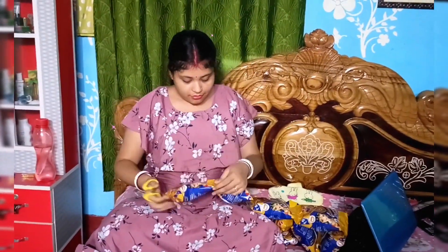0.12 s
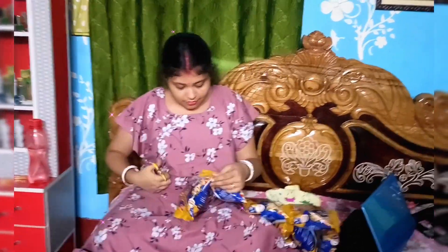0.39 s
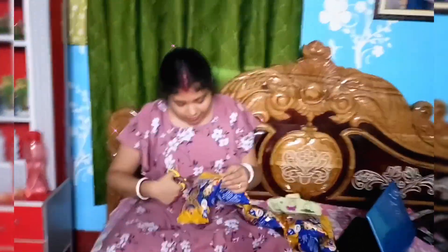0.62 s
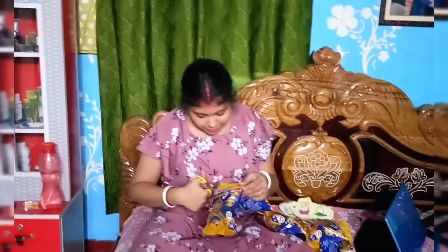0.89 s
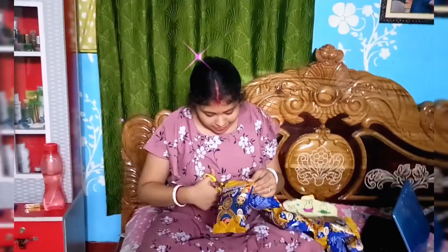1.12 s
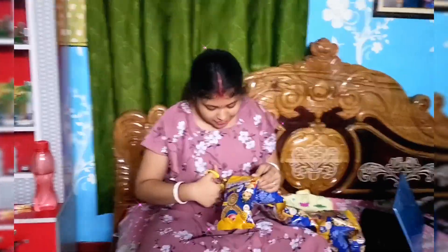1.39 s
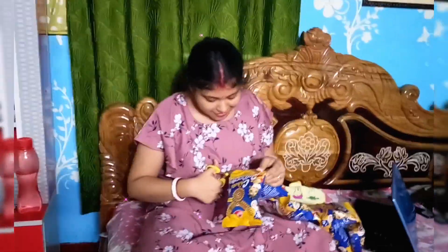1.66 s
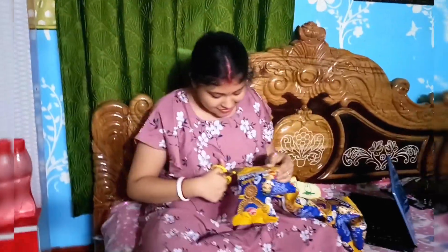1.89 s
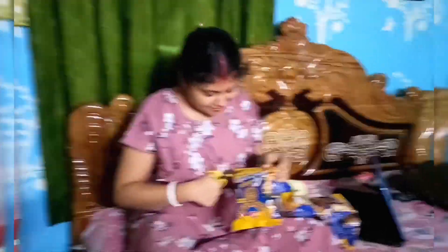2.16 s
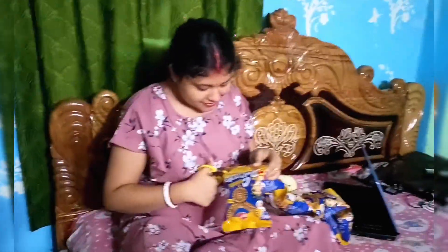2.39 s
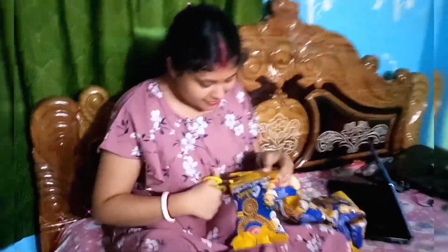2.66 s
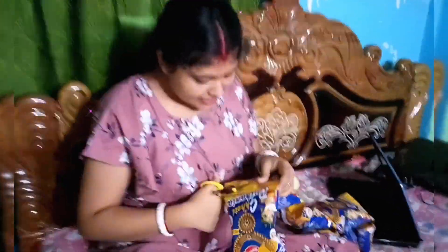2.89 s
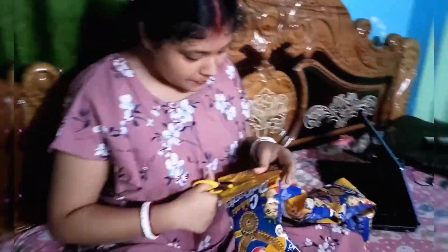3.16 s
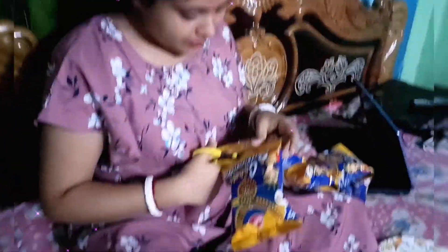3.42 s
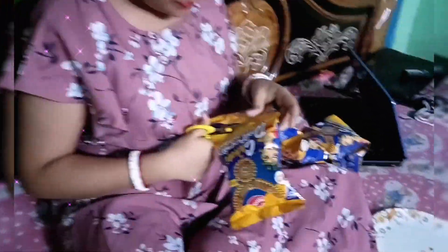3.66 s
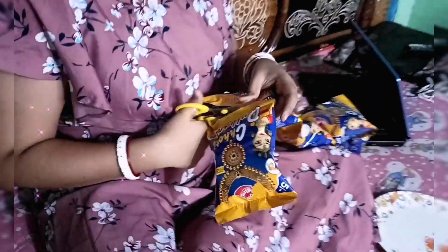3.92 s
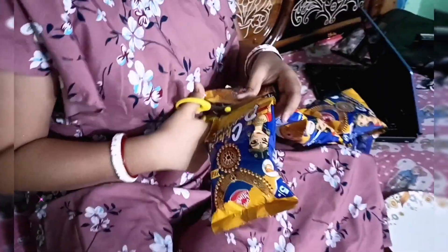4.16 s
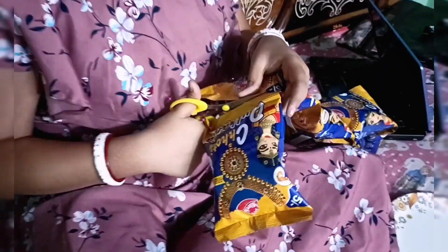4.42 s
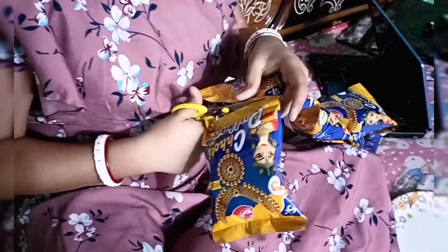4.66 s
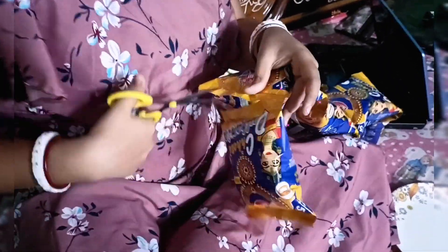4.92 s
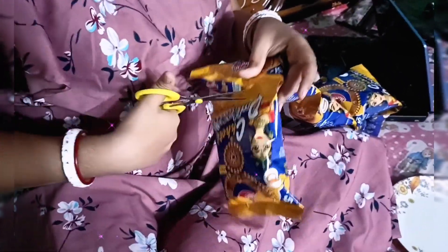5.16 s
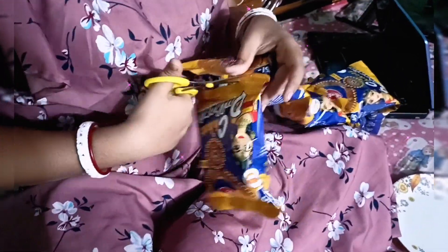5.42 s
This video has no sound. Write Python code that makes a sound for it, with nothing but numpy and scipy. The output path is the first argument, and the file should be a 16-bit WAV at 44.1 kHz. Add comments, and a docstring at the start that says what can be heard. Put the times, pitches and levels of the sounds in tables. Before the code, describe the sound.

Dense dry crackling of foil packets being squeezed and snipped close by, with a quiet gap early on and loud crisp snaps later.

```python
"""Foil snack packets are squeezed and cut with scissors on a bed in a small room, close to a phone.
The foil's dense crackle is thousands of tiny random flips, shaped by the sound of foil, packet and fizz.
Over it creases snap one by one as short bursts of noise, and the air-filled packet thumps.
A hard surface a metre away answers after 6 ms, then the room dies away.
A low rumble rises and falls under a faint hiss; one dry tick and one soft low tone come later."""
import sys
import numpy as np
from scipy import signal
from scipy.fft import rfft, irfft
from scipy.io import wavfile
from scipy.ndimage import map_coordinates

SR = 44100
rng = np.random.default_rng(int(sys.argv[2]) if len(sys.argv) > 2 else 0)


def store_wav(level_fs):
    """Save 16-bit WAV to argv[1]."""
    pcm = np.round(np.clip(np.atleast_2d(level_fs), -1, 1) * 32767)
    wavfile.write(sys.argv[1], SR, pcm.T.astype(np.int16))


def volts_from_db(level):
    """Convert decibel levels to linear amplitude ratios."""
    exponent = np.asarray(level, float) / 20
    return 10 ** exponent


N = 244755


def unit(x):
    """Scales x to an average strength (rms) of 1."""
    return x / np.sqrt(np.mean(x ** 2) + 1e-20)


def along(points, hz):
    """Reads a curve of (f/Hz, value) points, with frequency on a log axis."""
    f, v = np.transpose(points)
    return np.interp(np.log(hz + 1), np.log(f + 1), v)


def curves(rows):
    """Draws straight lines through a table: one value per sample for each column after the time."""
    s, *cols = np.transpose(rows)
    return [np.interp(np.arange(N) / SR, s, c) for c in cols]


def wobble(rate):
    """A smooth random curve with this many new random points a second."""
    knots = rng.standard_normal(int(N * rate / SR) + 4)
    return map_coordinates(knots, [np.arange(N) * rate / SR])


def coloured(x, spectrum):
    """Filters x to the given spectrum, with no sound ahead of its cause, and scales it to rms 1."""
    size = 4096
    gain = volts_from_db(along(spectrum, np.fft.rfftfreq(size, 1 / SR)))
    cepstrum = irfft(np.log(gain + 1e-6), size)
    # folding the second half onto the first makes the filter answer only after its input
    cepstrum[1:size // 2] *= 2
    cepstrum[size // 2 + 1:] = 0
    response = irfft(np.exp(rfft(cepstrum)), size)
    return unit(signal.fftconvolve(x, response)[:N])


# each squeeze or scissor stroke: (peak t/s, crackle level/dB, time to rise 20 dB t/s,
# time to fall 20 dB t/s, packet body level/dB over the crackle); the sign of a time is ignored
STROKES = [(0.0, -31.5, .1, 0.1737, -11), (.1, -37.5, .05, .1, -11.5), (.205, -32.5, .13, .1, -11),
           (0.309, -35.5, 0.16, 0.1259, -11), (.4, -40.5, 0, 0.0562, -10), (.455, -34.5, .02, .15, -10.5),
           (.58, -41, -0.05, .12, -11.5), (.65, -42, -0.05, .03, -6.5), (0.724, -40, 0.06, .08, -9.5),
           (.81, -47.5, 0.2, .04, -7), (.89, -69, 0.16, .1, 0), (.97, -48.5, .03, .048, -9),
           (1.08, -72.5, 0.5, 0.23, 1.5), (1.435, -66.5, .05, 0.1, -4), (1.525, -60.5, 0.03, .045, -10),
           (1.7, -70, 0.15, .08, -6), (1.81, -67.5, 0.06, 0, -2.5), (1.96, -56, .015, 0.6, -10),
           (2.01, -51.5, .07, 0.34, -6), (2.105, -45, 0.01, 0.1, -8), (2.144, -31.5, 0.0176, 0.04, -5.5),
           (2.2, -51, 0.046, 0.14, -12), (2.345, -47, .03, .1, -9), (2.42, -35.5, .015, .15, -16),
           (2.49, -35, .1, .06, -15.5), (2.59, -36, .06, 0.16, -15.5), (2.719, -38, 0.05, 0.08, -12.5),
           (2.87, -42.5, 0.07, 0.11, -3.5), (2.94, -42, 0.117, 0.05, -16), (3.07, -44, .028, 0.27, -13),
           (3.22, -47, 0.03, 0.2, -18), (3.29, -41.5, .1, 0.13, -4.5), (3.42, -39.5, .09, .1, -7.5),
           (3.485, -36.5, 0.0949, 0.1, -7.5), (3.681, -35.5, 0.12, .085, -8),
           (3.775, -27.5, .025, 0.05, -15), (3.84, -40.5, 0.06, .1, -10), (3.951, -33.5, .07, 0.11, -7),
           (4.03, -34, 0.07, .07, -12), (4.104, -36.5, 0.05, .08, -9.5), (4.203, -35, 0.02, .025, -2),
           (4.25, -39, 0.06, .025, -7.5), (4.34, -49, 0, 0.08, -9.5), (4.44, -60, 0, .05, -4),
           (4.48, -42, 0.01, 0.2, -8), (4.59, -44.5, .12, .07, -9), (4.711, -43.5, .015, .075, -19.5),
           (4.81, -38.5, .06, 0.17, -5), (4.915, -31.5, 0.1041, 0.0534, -11),
           (4.996, -38, 0.0359, .05, -18.5), (5.069, -39, 0.03, .035, -9), (5.129, -42, .025, 0.05, -6),
           (5.189, -29, 0.02, 0.02, -6.5), (5.23, -53.5, 0.1, .05, -3), (5.32, -55, 0.13, .1, 3.5),
           (5.393, -42, 0.06, .045, 0), (5.465, -48, .04, 1, -5), (5.5, -40, 0.05, 0.9, -8)]
# the hands are never quite still: (t/s, level/dB)
STILL_HANDS = [(0, -70), (1, -78), (1.9, -78), (2.1, -65), (5.55, -64)]


def handling():
    """Levels in dB of crackle, packet body and fizz: every squeeze rises, peaks and lets go."""
    shoulder = 1.66  # above 1 a squeeze holds near its peak, then lets go quickly
    body_lingers, fizz_lingers = 1.273, 1.13  # times slower than the foil to swell and die
    t = np.arange(0, N + 65, 32)[:, None] / SR
    s, db, rise, fall, body_db = np.transpose(STROKES)
    away = np.where(t < s, (s - t) / abs(rise), (t - s) / abs(fall))
    stirring = volts_from_db(np.interp(t[:, 0], *np.transpose(STILL_HANDS)))

    def total(peak_db, slower):
        """Adds the power of all squeezes and of the stirring."""
        squeezes = volts_from_db(peak_db - 20 * (away / slower) ** shoulder)
        power = (squeezes ** 2).sum(axis=1) + stirring ** 2
        return np.interp(np.arange(N) / SR, t[:, 0], 10 * np.log10(power))

    return total(db, 1), total(db + body_db, body_lingers), total(db, fizz_lingers)


# spectra, only their shape counts: (f/Hz, level/dB per Hz)
FOIL_SHAPE = [(880, -32), (1500, -13), (2640, -4.5), (3180, -1.5), (3420, -3.5), (4180, -1.5), (4860, -4.5),
              (6450, -8), (7690, -4.5), (11000, -21), (14300, -23.5), (22000, -120)]
BODY_SHAPE = [(130, -25.5), (220, 0.5), (252, -8.5), (305, -1), (485, -2), (762, -3), (1140, -6),
              (2200, -9.5), (2860, -20.5), (4840, -120)]
FIZZ_SHAPE = [(5290, -36.5), (9000, 13), (11200, 7), (14900, 10), (15900, -1), (16000, -47)]
# how tightly the foil is pulled: (t/s, fizz level/dB over the crackle)
TIGHTNESS = [(0, -16), (.3, -15), (.55, -11), (.8, -18), (1.2, -9), (1.55, -13), (1.9, -7), (2.15, -24),
             (2.39, -15), (2.42, -0.5), (2.6, -5.5), (2.9, -12.5), (3.2, -9.5), (3.5, -12.5), (3.65, -11),
             (3.78, -23), (3.9, -8.5), (4.2, -20), (4.48, -10), (4.62, -18), (4.95, -15), (5, -5.5),
             (5.12, -21), (5.19, -7), (5.28, -25), (5.55, -13)]
# how near the phone is: (t/s, room tail level/dB over the direct sound,
# smooth rubbing as a ratio to single flips)
NEARNESS = [(0, -3.5, 1.47), (1, -5, 2.3), (2.6, -7.5, 1.77), (3.6, -10.5, 0.63), (5.55, -8.5, 0.68)]


def crackle():
    """Countless tiny folds flip in clumps, most small and a few large, and shake foil and packet together."""
    foil_db, body_db, drive_db = handling()
    fizz_db, = curves(TIGHTNESS)
    smooth = curves(NEARNESS)[1]
    clumps = volts_from_db(0.51 * wobble(30) + 3.24 * wobble(200))
    chance, size, sign = rng.random(N), rng.exponential(1, N), rng.standard_normal(N)
    flips = unit((chance < 3000 / SR) * volts_from_db(2.25 * np.minimum(size, 4)) * sign)  # about 3000 a second

    def rub(share):
        """Single flips plus a share of smooth rubbing noise."""
        rubbing = share * smooth * rng.standard_normal(N)
        return clumps / np.hypot(1, smooth) * (flips + rubbing)

    foil = volts_from_db(foil_db) * coloured(rub(0.71), FOIL_SHAPE)
    fizz = volts_from_db(drive_db + fizz_db) * coloured(rub(0.76), FIZZ_SHAPE)
    body = volts_from_db(body_db) * coloured(rub(1.14), BODY_SHAPE)
    return foil + fizz + body


# rumble before its wavering: (t/s, level/dB)
RUMBLE_LEVEL = [(0, -51.5), (.63, -49.5), (1.2, -58.5), (1.75, -61.5), (2.26, -52), (2.85, -52), (3.2, -57),
                (3.6, -51.5), (3.8, -58), (4.1, -50.5), (4.55, -61), (4.95, -50.5), (5.55, -52)]
# spectra of rumble and hiss, only their shape counts: (f/Hz, level/dB per Hz)
RUMBLE_SHAPE = [(15, -42), (25, -20), (43, -21.5), (69, -14.5), (79, -17.5), (92, -3.5), (113, -7.5),
                (130, -4.5), (400, -25.5), (520, -70), (880, -120)]
HISS_SHAPE = [(180, -31), (300, 3.5), (433, -4.5), (486, -7), (1280, -23), (3240, -18), (6000, -32),
              (8090, -20), (10700, -34), (14700, -34), (16000, -50)]


def background():
    """Wavering low rumble and a faint hiss, both filtered noise."""
    rumble_db, = curves(RUMBLE_LEVEL)
    rumble = volts_from_db(rumble_db + 1.7 * wobble(9.8)) * coloured(rng.standard_normal(N), RUMBLE_SHAPE)
    hiss = volts_from_db(-67.5 + 1.4 * wobble(17)) * coloured(rng.standard_normal(N), HISS_SHAPE)
    return rumble + hiss


# how long the room rings: (f/Hz, time to die by 60 dB t/s)
ROOM_DECAY = [(300, 0.25), (2000, 0.18), (5000, 0.13), (12000, 0.17)]


def tail():
    """A fresh decay of noise with energy 1; each frequency dies at its own speed."""
    hz, t, z = signal.stft(rng.standard_normal(SR // 6), SR, nperseg=128)
    fade = volts_from_db(-60 * t / along(ROOM_DECAY, hz)[:, None])
    decay = signal.istft(z * fade, SR, nperseg=128)[1]
    return decay / np.linalg.norm(decay)


# near surfaces: (delay t/s, level/dB over the direct sound)
NEAR_ECHOES = [(.006, -8), (.0085, -10.5), (0.013, -23.5), (.017, -26)]


def room(x):
    """Direct sound, smeared near echoes, then the tail; each spot on the foil has its own answer."""
    out, wet_db = np.zeros(N + SR), curves(NEARNESS)[0]
    step = SR // 100  # a new answer every 10 ms
    smear = volts_from_db(-60 * np.arange(200) / SR / 0.0044)  # an echo dies by 60 dB in 4.4 ms
    for start in range(0, N, step):
        late = np.pad(tail(), (round(.007 * SR), 0))
        answer = volts_from_db(wet_db[start]) * late
        answer[0] = 1  # the direct sound
        for s, db in NEAR_ECHOES:
            scatter = smear * rng.standard_normal(len(smear))
            answer[round(s * SR):][:len(smear)] += volts_from_db(db) * scatter / np.linalg.norm(scatter)
        piece = signal.fftconvolve(x[start:start + step], answer)
        out[start:][:len(piece)] += piece
    return out[:N]


def small_creases():
    """Random lesser creases, as strong as the squeeze they fall in."""
    per_second = 14
    over_crackle_db, spread_db = 20, 3
    usual_hz, usual_ms = 4530, 1.4
    smooth_hides_db = 9  # weaker by this much per unit of smooth rubbing
    when, draw = rng.random(300), rng.standard_normal((300, 3))
    s = np.cumsum(-np.log(when) / per_second)
    strength_db = handling()[0] - smooth_hides_db * curves(NEARNESS)[1]
    db = np.interp(s * SR, np.arange(N), strength_db) + over_crackle_db + spread_db * draw[:, 0]
    hz = usual_hz * np.exp(0.23 * draw[:, 1])
    ms = usual_ms * np.exp(.45 * draw[:, 2])
    rows = np.transpose([s, db, hz, ms])
    return list(rows[s < N / SR])


# air and walls of the packet: (f/Hz, usual level/dB, time to die by 60 dB t/s)
PACKET_TONES = [(350, -1.5, 0.024), (733, 4.5, 0.013), (956, 0.5, 0.015), (1430, 2, 0.01)]


def thump(t):
    """The air and walls of the packet ring briefly, at slightly random strengths."""
    tones = 0
    for hz, db, t60 in PACKET_TONES:
        fading = volts_from_db(db + 1.75 * rng.normal() - 60 * t / t60)
        tones = tones + fading * np.sin(2 * np.pi * hz * t)
    return tones * (1 - np.exp(-t / 0.00095))  # the air inside follows softly


# fingers or blades bump the packet: (t/s, level/dB)
PACKET_BUMPS = [(0.1984, -33), (.656, -36.5), (.7172, -38), (2.1406, -34), (2.1565, -33), (2.707, -34.5),
                (2.9006, -37), (3.9709, -30.5), (4.197, -25), (4.8046, -34), (4.8416, -30), (4.913, -33),
                (5.1813, -26), (5.1875, -26.5), (5.316, -44), (5.389, -30)]


def bumps():
    """Fingers or blades bump the packet and set off its thump alone."""
    out, t = np.zeros(N + SR), np.arange(4096) / SR
    for s, db in PACKET_BUMPS:
        out[round(s * SR):][:len(t)] += volts_from_db(db) * thump(t)
    return out[:N]


# creases that snap clearly: (t/s, peak level/dB of the crack, strongest f/Hz, length/ms)
CLEAR_CREASES = [(.1985, -19.5, 4870, 2), (0.3114, -20.5, 6300, 1.4), (0.5714, -20.5, 6600, 0.82),
                 (0.6559, -25.5, 8100, 2), (0.7173, -27.5, 7900, 5.2), (1.9064, -47.5, 3360, 0.8),
                 (1.9825, -38, 4700, 0.93), (2.1045, -27, 3750, 2.6), (2.1354, -25, 6240, 1.5),
                 (2.1402, -18, 2650, 1.5), (2.1574, -18.5, 2800, 2.2), (2.3381, -26.5, 4570, 2.3),
                 (2.413, -13.5, 8230, 2.9), (2.5747, -24, 3140, .9), (2.6126, -23.5, 7800, 1.6),
                 (2.707, -24.5, 4480, 3), (2.7125, -17, 8100, 0.82), (2.8448, -27, 3730, 4.5),
                 (2.941, -19, 5860, 0.98), (3.0556, -28.5, 4950, 1.8), (3.0982, -28, 4500, 0.67),
                 (3.1343, -29, 4520, 1.4), (3.205, -29, 4090, 1.1), (3.6053, -25.5, 4750, 4.1),
                 (4.9027, -17, 4520, 1.4), (.2617, -24, 5680, 1.2), (3.1713, -25.5, 8000, 1.4),
                 (3.216, -22.5, 4870, 1.65), (3.2477, -22, 5150, 1.6), (3.2615, -19, 4800, 1.1),
                 (3.284, -23, 4220, 1.1), (3.2945, -23.5, 4780, .8), (3.0706, -27, 4200, .8),
                 (3.45, -19, 5170, 1.5), (3.4826, -17.5, 5540, 1.7), (4.017, -12, 3830, .64),
                 (3.782, -15, 3500, 5.6), (4.9955, -19.5, 3300, 3.4), (5.067, -21.5, 4000, 1),
                 (3.4266, -18.5, 4550, .7), (3.4562, -16.5, 4550, 0.82), (3.4776, -15, 4870, 1.2),
                 (3.6159, -23.5, 4600, 1.5), (3.6473, -15.5, 4570, 1.1), (3.6811, -13, 3780, 1.4),
                 (3.6981, -16, 3800, 1.8), (3.76, -11.5, 6930, 1.1), (3.773, -10.5, 3600, 4.7),
                 (3.8317, -24, 3620, 3.1), (3.9165, -19, 4570, 1.25), (3.9394, -18, 4520, 1.8),
                 (3.9709, -10.5, 4610, 1.9), (4.013, -5, 5430, 0.44), (4.027, -10.5, 7360, 1.8),
                 (4.0512, -4, 4400, 0.65), (4.1014, -9, 5500, 1), (4.197, -10, 4370, 0.46),
                 (4.2261, -22, 5380, 1.3), (4.2448, -13.5, 4830, .95), (4.306, -25.5, 6200, 1.2),
                 (4.3384, -22, 4240, 1.4), (4.433, -39.5, 4820, 1.4), (4.4671, -22, 4280, 2.9),
                 (4.542, -25, 3830, 1.2), (4.5748, -16, 4600, .8), (4.58, -18.5, 4240, 1.8),
                 (4.6131, -12.5, 4160, 1.1), (4.7054, -22.5, 5510, 0.68), (4.763, -28.5, 3660, 1.1),
                 (4.7978, -19, 4050, 3), (4.8115, -16.5, 4300, 1.2), (4.8417, -7, 5800, 1.34),
                 (4.8625, -18, 7540, 2.5), (4.913, -13, 5200, 1.4), (4.9903, -14.5, 6000, 1.6),
                 (5.0608, -16.5, 4010, .96), (5.118, -26, 4870, 2.3), (5.1817, -16.5, 5760, 1.5),
                 (5.2817, -30.5, 4150, 1.1), (5.308, -34.5, 4070, 0.77), (5.3672, -39, 3230, 1.5),
                 (5.389, -25, 4640, 2.1), (5.4796, -15, 4250, 1.2), (5.5156, -18.5, 6070, .7)]


def snaps():
    """A crease buckles: a dry burst over the whole foil, strongest near its own pitch, with fizz and thump."""
    thump_db = -23.5  # the packet's answer to a snap, next to the snap's peak
    out, t = np.zeros(N + SR), np.arange(4096) / SR
    f = np.fft.rfftfreq(len(t), 1 / SR)
    small = (f / 3200) ** 4 / (1 + (f / 3200) ** 4)  # a tiny fold gives off little deep sound
    foil, fizz = small * volts_from_db(along(FOIL_SHAPE, f)), volts_from_db(along(FIZZ_SHAPE, f))
    fizz_db, = curves(TIGHTNESS)  # a snap's fizz follows the crackle's
    for s, db, hz, ms in CLEAR_CREASES + small_creases():
        at = min(round(s * SR), N - 1)
        u = 1000 * t / np.clip(ms, .3, 15)  # time counted in lengths of this snap
        jolt = rfft(np.sqrt(u) * np.exp(-1.3 * u) * rng.standard_normal((2, len(t))))
        crease = 1j * f * 1300 / (hz * hz - f * f + 1j * f * 1300)  # a broad resonance of this fold
        crack, spit = irfft(jolt * [foil * (0.43 + crease), fizz])
        sound = crack / abs(crack).max() + 0.59 * volts_from_db(fizz_db[at]) * spit / abs(spit).max()
        out[at:][:len(t)] += volts_from_db(db) * (sound + volts_from_db(thump_db) * thump(t))
    return out[:N]


# a dry tick right at the phone: (t/s, level/dB, f/Hz)
DRY_TICK = (2.2856, -15, 8330)


def tick():
    """A half-millisecond click: three bright cycles and one small push, too close for the room to answer."""
    s, db, hz = DRY_TICK
    t = np.arange(N) / SR - s
    bright = np.exp(-((t - .0003) / 0.0002) ** 2) * np.sin(2 * np.pi * hz * t)
    push = np.exp(-((t - .00045) / .00003) ** 2)
    return volts_from_db(db) * (bright + 0.99 * push)


# a low tone rings on after a snip: (t/s, f/Hz, level/dB, time to die by 60 dB t/s)
LOW_TONE = (4.24, 351, -41, 0.4)


def ring():
    """One soft low tone that swells quickly and dies."""
    s, hz, db, t60 = LOW_TONE
    t = np.maximum(np.arange(N) / SR - s, 0)
    swell = 1 - np.exp(-t / 0.01)
    return volts_from_db(db - 60 * t / t60) * swell * np.sin(2 * np.pi * hz * t)


def scene():
    """The packets in the room, with the tick, the low tone and the background added."""
    packets = crackle() + bumps() + snaps()
    return (room(packets) + tick() + ring() + background())[None]


def band_limit(x):
    """A steep low-pass at the top of the band."""
    return signal.sosfilt(signal.butter(12, 16660, fs=SR, output="sos"), x)


def record(dry):
    """The phone drops the deepest bass and the top treble."""
    bass_cut = signal.butter(2, 45, "high", fs=SR, output="sos")
    treble_cut = signal.cheby2(16, 32, 15650, fs=SR, output="sos")  # 32 dB down from 15650 Hz up
    mix = signal.sosfilt(np.vstack([bass_cut, treble_cut]), dry)
    return band_limit(mix)


dry = scene()
out = record(dry)
store_wav(out)
```